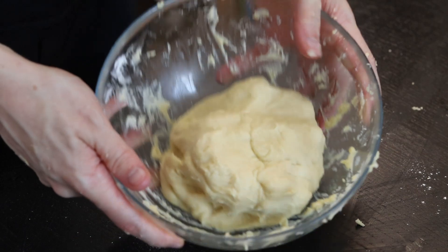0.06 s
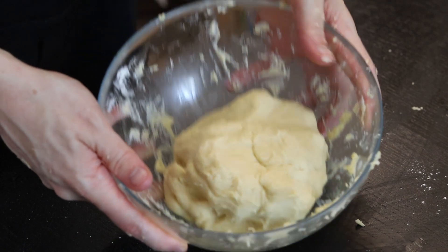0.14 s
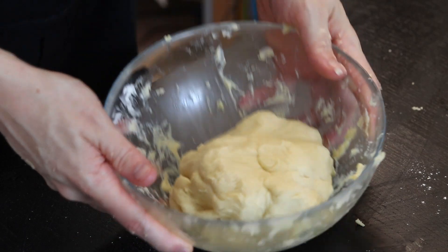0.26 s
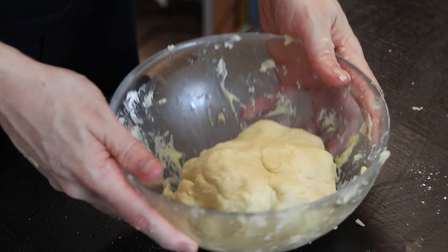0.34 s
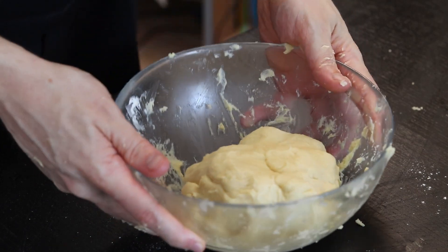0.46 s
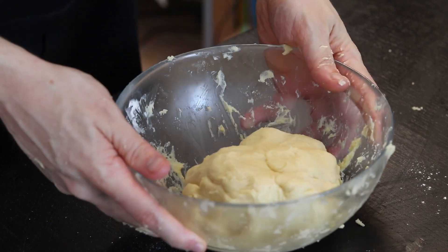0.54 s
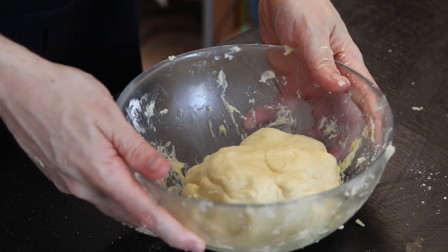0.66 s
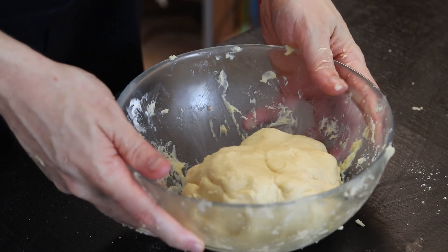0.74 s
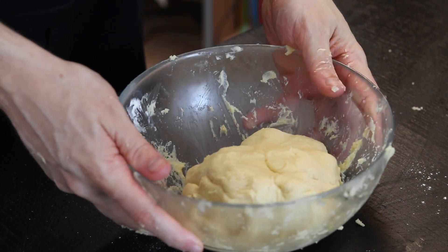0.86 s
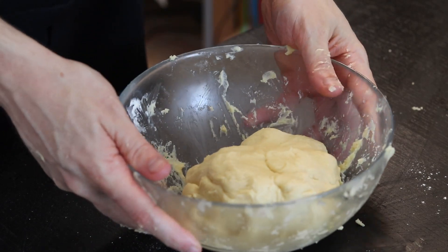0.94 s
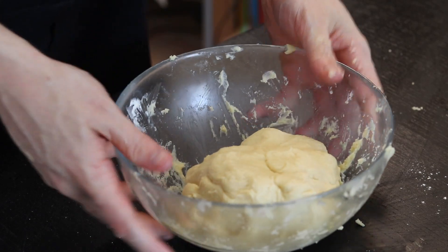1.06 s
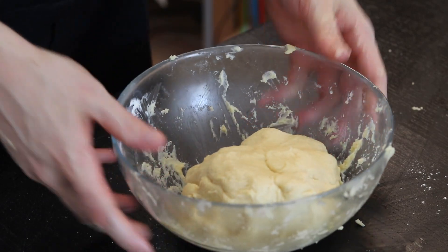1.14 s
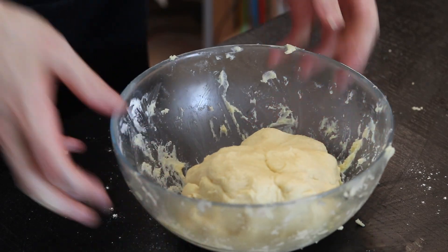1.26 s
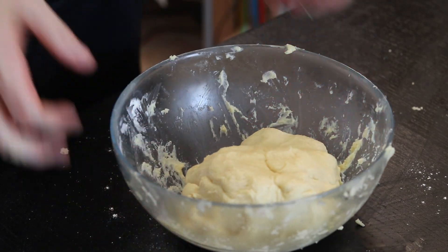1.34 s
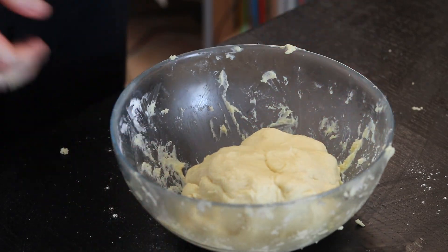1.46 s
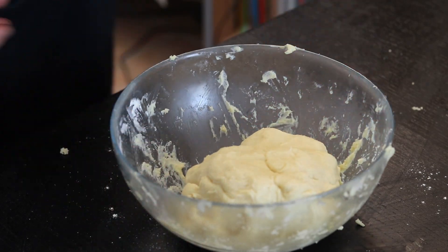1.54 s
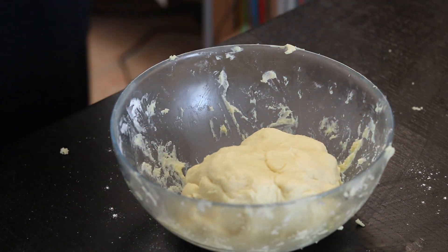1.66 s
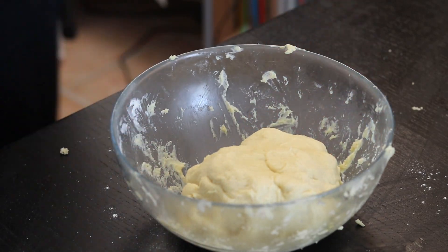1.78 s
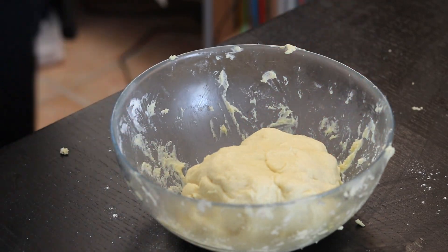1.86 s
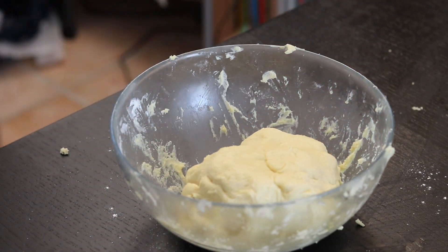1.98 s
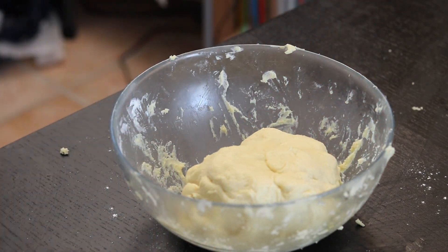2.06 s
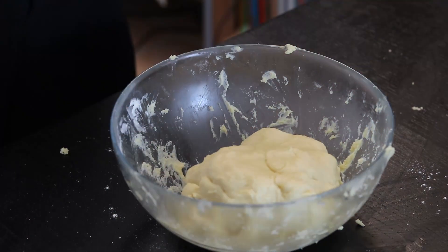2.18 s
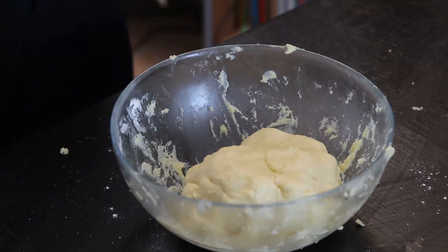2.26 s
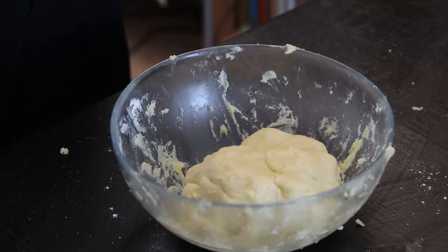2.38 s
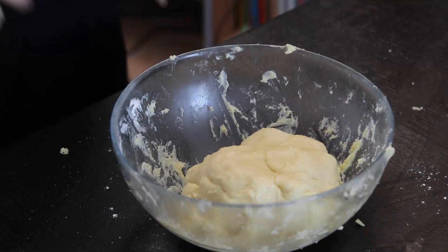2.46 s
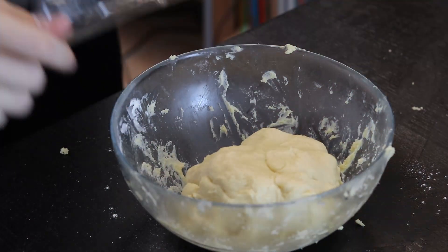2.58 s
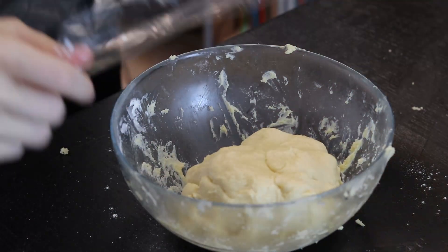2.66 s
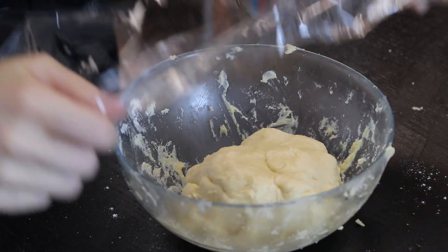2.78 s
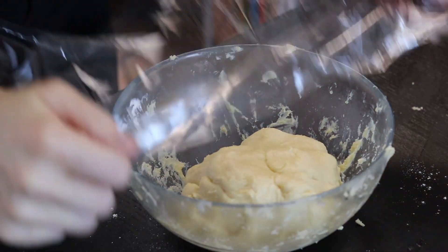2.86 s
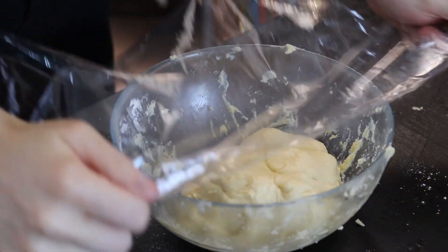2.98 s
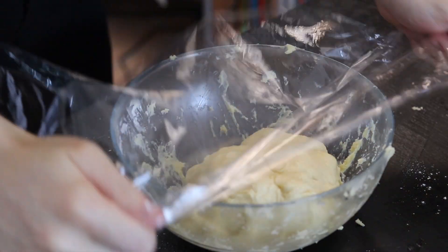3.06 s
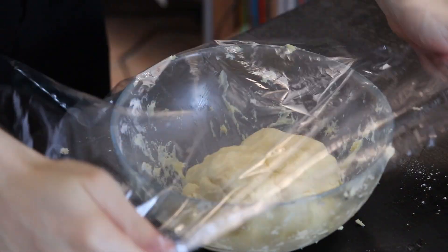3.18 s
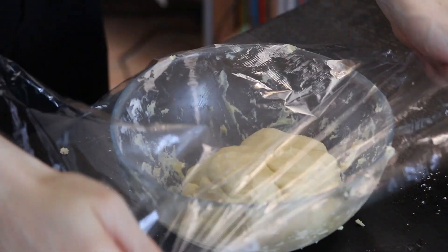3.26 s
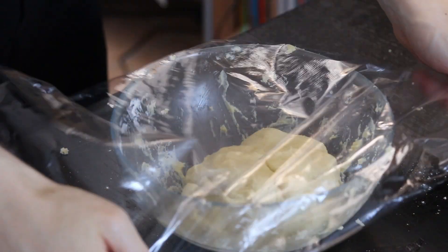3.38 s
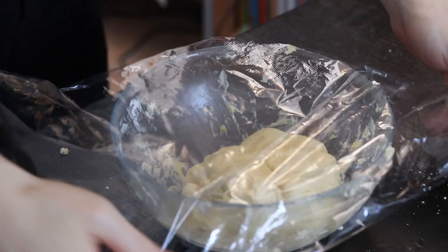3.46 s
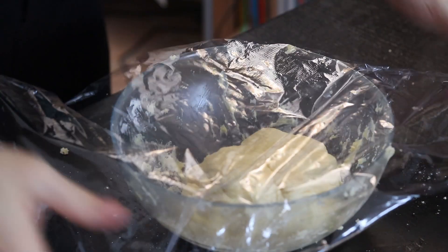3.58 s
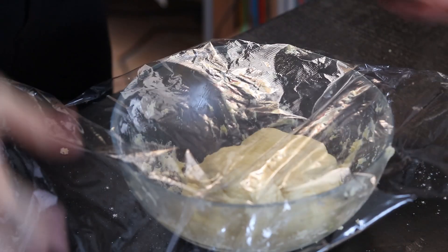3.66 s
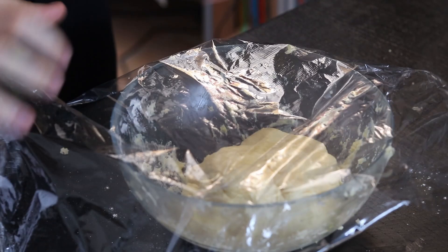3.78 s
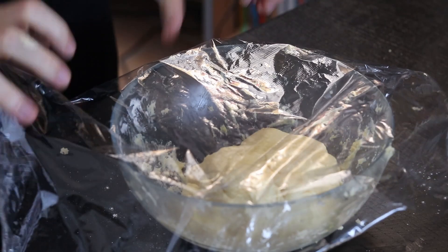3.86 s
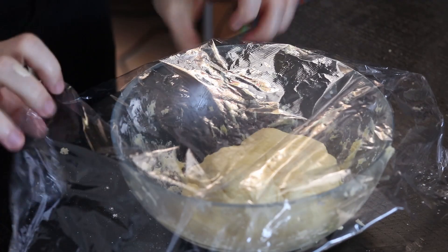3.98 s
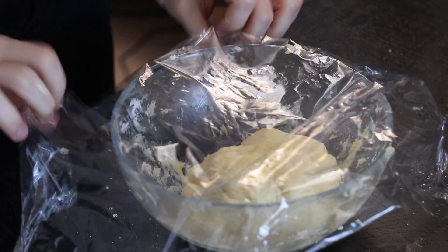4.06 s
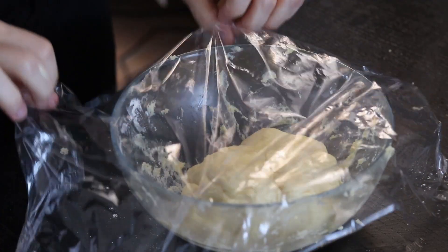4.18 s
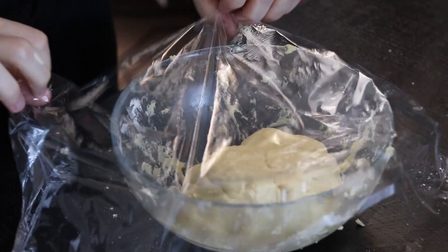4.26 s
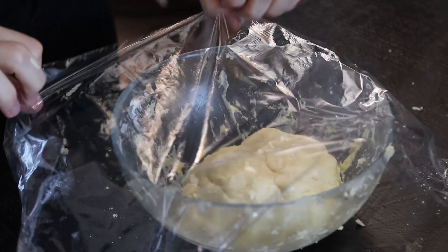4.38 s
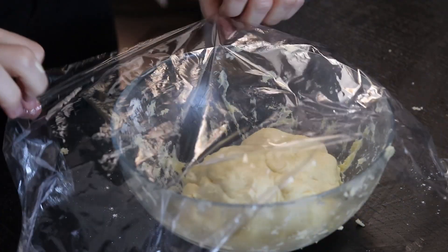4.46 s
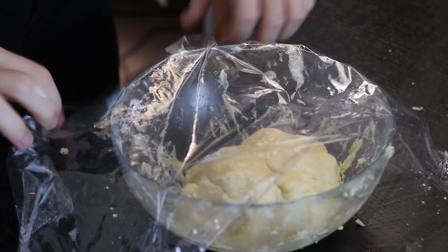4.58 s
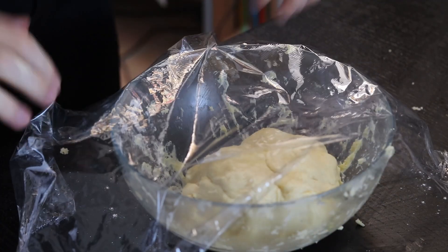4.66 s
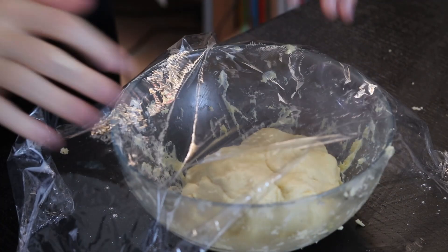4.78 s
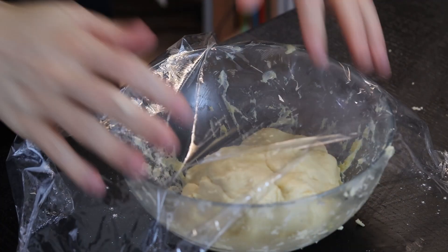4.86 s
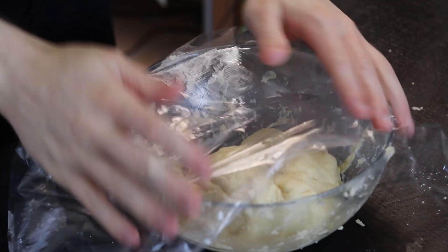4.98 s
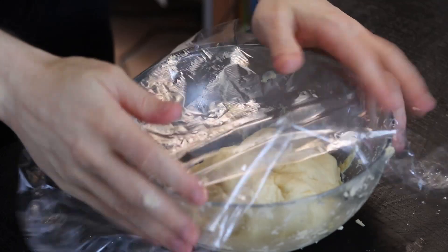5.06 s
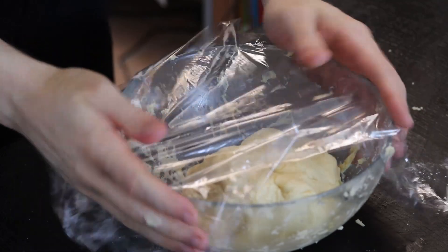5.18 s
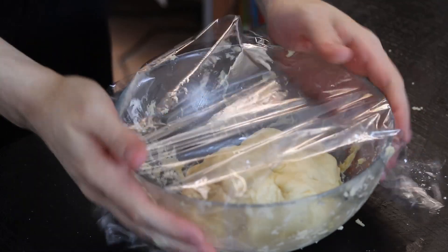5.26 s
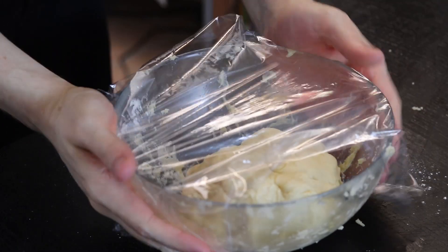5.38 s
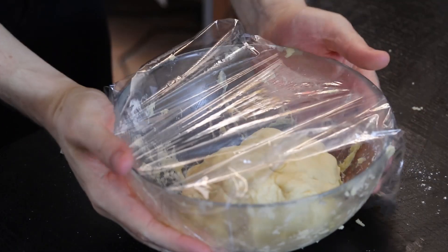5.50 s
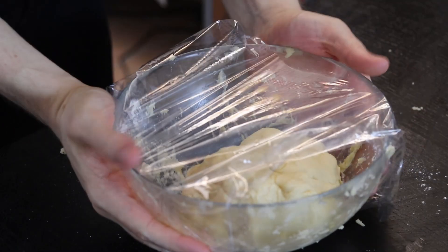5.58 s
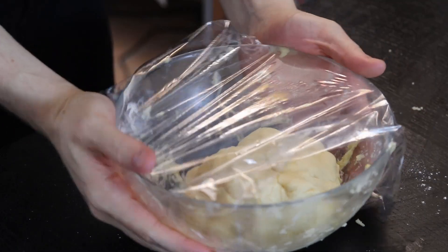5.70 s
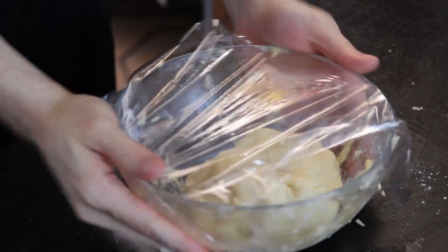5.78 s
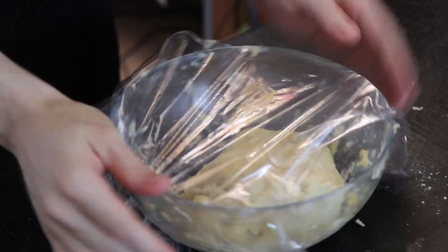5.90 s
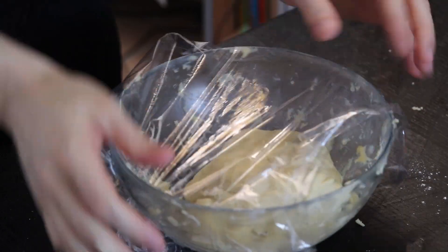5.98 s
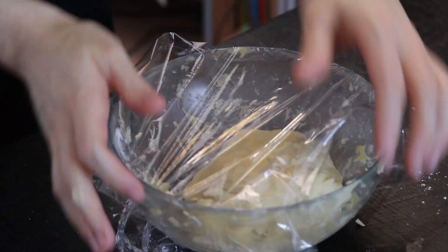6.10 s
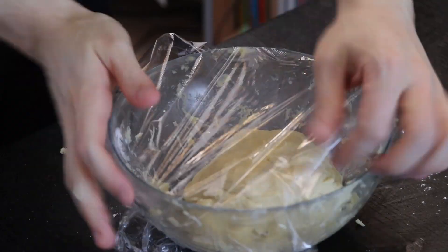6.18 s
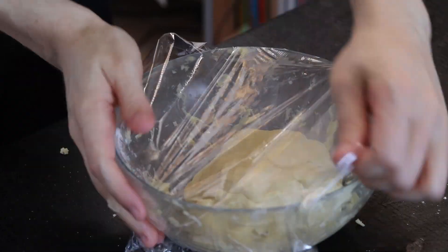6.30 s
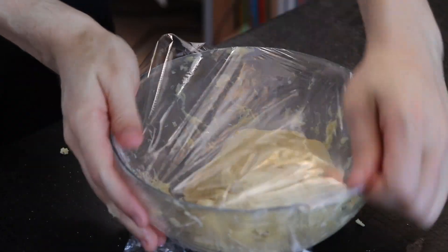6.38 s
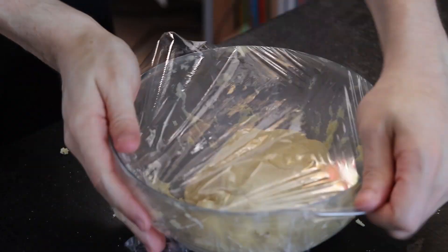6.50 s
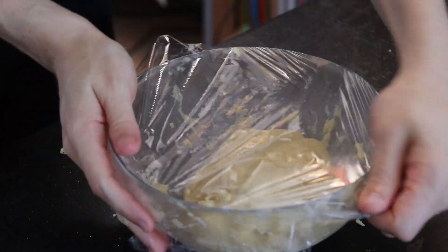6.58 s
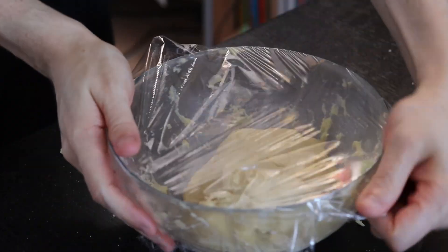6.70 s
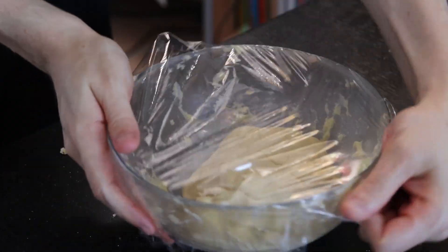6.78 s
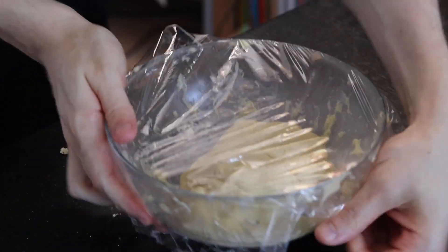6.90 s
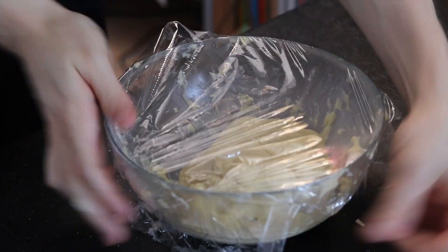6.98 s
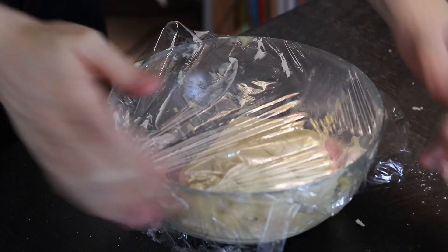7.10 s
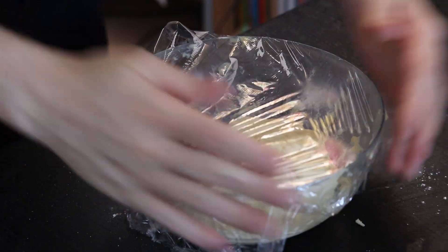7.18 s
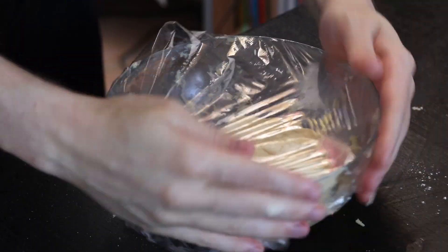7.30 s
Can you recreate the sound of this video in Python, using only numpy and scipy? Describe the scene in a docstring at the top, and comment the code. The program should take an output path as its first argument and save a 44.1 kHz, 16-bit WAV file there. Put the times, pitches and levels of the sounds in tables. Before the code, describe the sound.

A heavy glass bowl thuds onto a wooden table, then after a quiet gap, plastic film crinkles, snaps and stretches in growing bursts.

```python
"""A small room with a wooden table: a glass bowl of dough lands on it with one hard thud.
The thud is a push on the wood, a glassy clatter and decaying table modes; a gritty scuff follows.
Cling film is lifted, draped and smoothed down: dense filtered impulses rustle and short bursts snap as
creases. Irregular pulses through narrow resonances give short pitched swells and a low scrape of the
bowl, which bumps softly. Shaped noise and a low sine lie underneath as hiss and hum."""
import sys
import numpy as np
from scipy import signal
from scipy.fft import rfft, irfft, next_fast_len
from scipy.io import wavfile
from scipy.ndimage import uniform_filter1d, map_coordinates

SR = 44100
rng = np.random.default_rng(int(sys.argv[2]) if len(sys.argv) > 2 else 0)


def generate_wav(sig):
    """Save sig (samples, or channels by samples) to the path in sys.argv[1] as 16-bit PCM at SR."""
    pcm = np.round(np.clip(np.atleast_2d(sig).T, -1, 1) * 32767).astype(np.int16)
    wavfile.write(sys.argv[1], SR, pcm)


N = 323694  # samples, about 7.3 s

# Bowl meets table. Each row: start in seconds, level in dB, hardness as the corner of the blow in Hz.
BOWL_KNOCKS = [(0.3373, -15.5, 13000), (0.636, -44, 150), (6.683, -36.5, 357), (7.038, -44.5, 650)]
# Ringing modes of the table with the bowl on it. Each row: pitch in Hz, relative level in dB, t60 in seconds.
TABLE_MODES = [(105, -24.5, 0.36), (119.5, -13, 0.61), (166.5, 2, 0.24), (191.8, -8, 0.31), (228, -2, 0.28),
               (259, -23, 0.4), (301.6, -6.5, 0.36), (341.88, -1.5, 0.31), (374.3, 2.5, 0.14),
               (507, -1, 0.21), (546, -13.5, 0.32), (606, -10, 0.2), (671, -11, .28), (750, -12, 0.23),
               (907, -20, 0.39), (978, -24.5, 0.4553), (1048, -17, 0.37), (1165, -31, 0.46),
               (1254, -23, .27), (1630, -11, 0.14), (1690, -26, 0.49), (1885, -29, 0.25),
               (2390, -19, 0.069), (2600, -36, .25)]
# Spectrum of the first push on the wood. Each row: frequency in Hz, relative level in dB.
PUSH_SPECTRUM = [(30, -45), (60, -29), (85, -2.5), (115, 1), (170, 6), (250, 1.5), (360, 0.5), (500, -8),
                 (800, -12.5), (1500, -32.5), (4000, -38), (16000, -84)]
# Spectrum of glass chattering on wood at contact. Each row: frequency in Hz, relative level in dB.
CLATTER_SPECTRUM = [(60, -40), (150, -25), (350, -4.5), (600, 4.5), (1100, -2), (1650, -5.5), (2050, -10.5),
                    (2450, -7.5), (2900, -22), (6000, -22.5), (7200, -30), (8700, -28.5), (10500, -41),
                    (16000, -48)]
# Spectrum of floury grit under the bowl. Each row: frequency in Hz, relative level in dB.
GRIT_SPECTRUM = [(800, -18), (2000, 4), (3400, -2), (6000, -3), (7200, -2), (8700, -1), (10500, -13),
                 (16000, -17)]
# Pulls, drapes and presses of the film: four rows fetch it, two carry it over, four drape it and let go,
# five tug the far edge, five smooth it down, four stretch it round the rim, one is a last pat.
# Each row: time of full strength in seconds, time to swell by 10 dB in seconds, hold in seconds,
# crinkle level in dB, level of sliding hands over the crinkle in dB.
FILM_STROKES = [ (1.37, .13, .24, -72.5, -2), (2.02, .04, .05, -70.5, -3.5),
                (2.138, .003, .045, -55.6, -7.5), (2.29, .04, .12, -66, -11), (2.57, .025, .3, -63.3, -12),
                (2.908, .028, .012, -53, -14), (3.125, .09, .065, -57.2, -10.5), (3.34, .1, .1, -59.7, -7),
                (3.46, .03, .075, -55.3, -7.5), (3.585, .02, .015, -67, 3), (4.01, .11, .065, -70.4, -1.5),
                (4.15, .02, .058, -62.2, -4.5), (4.4, .12, .015, -54.6, -6.5), (4.565, .03, .02, -67, -2),
                (4.612, .012, .02, -55.8, -8), (5.008, .003, .1, -57.5, -5.5),
                (5.13, .035, .025, -51.3, -8), (5.232, .022, .325, -52, -10), (5.62, .07, .057, -57.2, -8),
                (5.83, .05, .07, -53, -6), (6.345, .075, .055, -52.8, -6), (6.562, .08, .01, -48.3, -7.5),
                (6.635, .008, .085, -52.2, -6.5), (6.962, .13, .035, -51.3, -3.5),
                (7.326, .03, .02, -52.2, -8.5)]
# Spectrum of the crinkling film. Each row: frequency in Hz, relative level in dB.
CRINKLE_SPECTRUM = [(700, -30), (1200, -4), (1500, -5), (2300, -2), (3000, -3.5), (3900, -3), (5400, -2.5),
                    (6700, -5.5), (7800, -1.5), (8700, 1.5), (10300, -6.5), (14300, -6), (15500, -14),
                    (16000, -10.5)]
# Spectrum of hands sliding on the film. Each row: frequency in Hz, relative level in dB.
SLIDE_SPECTRUM = [(150, -12), (300, -3), (600, -0.5), (900, 0), (1300, -0.5), (2000, -6), (3200, -25),
                  (7000, -25)]
# The sharpest creases snapping through. Each row: start in seconds, level in dB before SNAP_GAIN_DB,
# pitch in Hz.
SHARP_SNAPS = [(2.1367, -43, 6260), (2.3531, -46, 8320), (2.3945, -49, 4560), (2.4304, -41, 5770),
               (2.4733, -44, 7650), (2.9103, -39, 8320), (2.9238, -36, 8440), (2.9836, -39, 7950),
               (3.0527, -42, 8230), (3.1218, -43, 8490), (3.1857, -37, 5850), (3.275, -40, 8340),
               (3.3348, -35, 4110), (3.3917, -37, 5570), (3.46, -30.5, 5480), (3.912, -47, 5230),
               (4.3924, -42, 8390), (4.413, -32.5, 8030), (4.6079, -47, 8120), (5.01, -44, 4050),
               (5.4187, -29.5, 8400), (5.428, -36, 7870), (5.459, -33, 5330), (5.5238, -39, 7480),
               (5.9703, -41, 8430), (6.0662, -39, 4500), (6.2716, -41.5, 5770), (6.552, -37, 8260),
               (6.571, -31, 8480), (6.6367, -36, 5520), (6.6428, -30, 8140), (6.7136, -43, 5250),
               (6.7695, -27.5, 4310), (6.777, -31.5, 4480), (6.8516, -36, 5080), (6.8803, -44, 5890),
               (6.9598, -32, 8380), (7.3214, -38, 4950)]
# Short pitched swells of irregular pulses; the last row is a low, longer scrape of the bowl.
# Each row: centre in seconds, half-length of the swell in seconds, level in dB, typical pulses a second,
# main resonance in Hz.
PITCHED_SWELLS = [(2.233, .028, -67.5, 180, 1410), (2.681, 0.041, -69, 113, 2470),
                  (4.2, .04, -67, 190, 1560), (4.354, 0.043, -63, 175, 1490), (4.445, .025, -66, 180, 1310),
                  (6.424, 0.044, -57, 200, 1350), (6.568, 0.024, -48, 224, 1294),
                  (6.96, 0.18, -60.5, 130, 467)]
# Narrow resonances of the swells. Each row: multiple of the main resonance, width in Hz, relative level in dB.
SWELL_RESONANCES = [(.52, 35, -4), (.66, 30, -4), (1, 130, -1), (2.19, 150, -13)]
# Decay of the room. Each row: frequency in Hz, t60 in seconds.
ROOM_DECAY = [(150, 0.48), (350, 0.54), (700, 0.42), (1500, 0.42), (4000, 0.3), (9000, 0.15), (15000, 0.42)]
# Spectrum of the room noise. Each row: frequency in Hz, relative level in dB.
AIR_SPECTRUM = [(15, -26), (30, -15), (85, -7.5), (125, -1), (160, 0.5), (210, -6.5), (400, -10.5),
                (600, -14), (900, -18.5), (1600, -24.5), (6000, -28), (16000, -30)]

# the bowl shifts on the floury table as it lands
SKID_DB, SKID_HOLD_S, SKID_FADE_DB_PER_S = -67, 0.16, 200
# the film settles once let go, then its folds go on relaxing faintly
RELEASE_DB_PER_S, RELAX_DB, RELAX_DB_PER_S = 146, -6, 78
HANG_DB = -77.5  # the quietest rustle, while the film is fetched or hangs loose
SNAP_GAIN_DB = 0.5
# lesser creases give way at random: more often and harder as the crinkle grows
BRISK_DB = -55  # crinkle level at which the rate and level below hold
CREASES_PER_S, CREASE_DB, CREASE_SCATTER_DB = 26, -43, 3.1
CREASE_GROWS = 0.4  # dB per dB of crinkle
CREASE_HZ, CREASE_SPREAD_OCT = 8000, 0.3
STILL_DB = -13.5  # this far under a brisk crinkle no lesser crease gives way
HUM_HZ, HUM_DB = 99.7, -67.5
TOP_HZ = 15900


def knocks(ring_db=-9, push_db=4, clatter_db=-33.5, clatter_life_s=0.003, wet_db=0, boom_db=-11):
    """Each blow pushes the wood, chatters and rings the table; soft blows lose their treble."""
    out = np.zeros(N)
    t = np.arange(SR * 3 // 4) / SR
    for start, db, hard_hz in BOWL_KNOCKS:
        ring = np.zeros(len(t))
        for k, (hz, level, t60) in enumerate(TABLE_MODES):
            # neighbouring modes start in opposite directions
            ring += (-1) ** k * amp(level - 60 * t / t60) * np.sin(2 * np.pi * hz * t)
        chatter = rng.standard_normal(len(t)) * np.exp(-t / clatter_life_s)
        clatter = unit(signal.fftconvolve(chatter, pulse(CLATTER_SPECTRUM))[:len(t)])
        push = np.zeros(len(t))
        add(push, 0, pulse(PUSH_SPECTRUM))
        blow = amp(ring_db) * ring * (1 - np.exp(-t / 0.00081))
        blow += amp(clatter_db) * room(clatter, wet_db)
        blow += amp(push_db) * room(push, boom_db)
        # the contact is a damped spring: it passes little far above its corner
        blow = filtered(blow, lambda hz: 1 / (1 + 1j * hz / hard_hz - (hz / hard_hz) ** 2))
        add(out, start, amp(db) * blow)
    return out


def skid():
    """Irregular grit impulses make a short scuff under the bowl from the first thud on."""
    t = np.arange(N) / SR - BOWL_KNOCKS[0][0]
    level_db = SKID_DB - SKID_FADE_DB_PER_S * np.maximum(t - SKID_HOLD_S, 0)
    grit = coloured(crackle(rate=5500, scatter_db=3), GRIT_SPECTRUM)
    return grit * amp(level_db) * (t > 0)


def handling():
    """Levels in dB of crinkling and of sliding: every stroke swells, holds, settles and relaxes."""
    t = np.arange(N) / SR
    crinkle_power = amp(HANG_DB) ** 2 * (t > FILM_STROKES[0][0]) + 1e-12
    slide_power = np.full(N, 1e-12)
    for start, swell, hold, db, slide_db in FILM_STROKES:
        since_release = np.maximum(t - start - hold, 0)
        settling = -RELEASE_DB_PER_S * since_release
        relaxing = RELAX_DB - RELAX_DB_PER_S * since_release
        level_db = db - 10 * np.maximum(start - t, 0) / swell
        level_db += np.maximum(settling, relaxing)
        power = amp(np.maximum(level_db, -160)) ** 2
        crinkle_power += power
        slide_power += power * amp(slide_db) ** 2
    return 10 * np.log10(crinkle_power), 10 * np.log10(slide_power)


def film(crinkle_db, slide_db, tick_db=-3, tick_rate=35, count=12):
    """Moving film sheds a hail of tiny buckles over a fine rustle; hands slide on it more dully."""
    ticks = np.zeros(N)
    # creases of different sizes each tick with their own colour
    for hz in np.geomspace(2500, 13000, count):
        impulses = crackle(tick_rate, scatter_db=3.5)
        ticks += unit(signal.oaconvolve(impulses, snap(hz))[:N])
    rustle = shifting(coloured(crackle(rate=7000, scatter_db=2.0), CRINKLE_SPECTRUM), patchy_db=2.5)
    crinkle = unit(rustle + amp(tick_db) * coloured(ticks, CRINKLE_SPECTRUM))
    crinkle = crinkle * amp(crinkle_db + 1.57 * wobble(70))
    slide = shifting(coloured(crackle(rate=2500, scatter_db=4.0), SLIDE_SPECTRUM), patchy_db=2.5)
    return crinkle + slide * amp(slide_db + 0.66 * wobble(35))


def shifting(x, patchy_db):
    """Folds open and close, so passing resonances colour the sound; rms 1."""
    z = signal.stft(x, nperseg=512)[2]
    # random gains, smoothed over frequency and then over time
    field = uniform_filter1d(rng.standard_normal(z.shape), size=7, axis=0)
    field = uniform_filter1d(field, size=7, axis=1)
    return unit(signal.istft(z * amp(patchy_db * unit(field)), nperseg=512)[1][:N])


def snaps(crinkle_db):
    """The loud single creases, and lesser ones whose rate and size follow the crinkle."""
    out = np.zeros(N)
    for start, db, hz in SHARP_SNAPS:
        add(out, start, amp(db + SNAP_GAIN_DB) * snap(hz))
    effort_db = crinkle_db - BRISK_DB
    chance = CREASES_PER_S / SR * amp(CREASE_GROWS * effort_db) * (effort_db > STILL_DB)
    starts = np.flatnonzero(rng.random(N) < chance)
    for i, (size, pitch) in zip(starts, rng.standard_normal((len(starts), 2))):
        db = CREASE_DB + CREASE_GROWS * effort_db[i] + CREASE_SCATTER_DB * size
        hz = CREASE_HZ * 2 ** (CREASE_SPREAD_OCT * pitch)
        add(out, i / SR, amp(db) * snap(hz))
    return out


def snap(hz, size=512):
    """A buckling crease: a sharp flick, broad around hz, and a brief flutter; always the same energy."""
    t = np.arange(size) / SR
    flick_and_flutter = np.exp(-t / 0.0002) + 0.1 * np.exp(-t / 0.0018)
    burst = rng.standard_normal(size) * flick_and_flutter
    colour = pulse([(hz / 8, -22), (hz / 2, -5), (hz, 0), (hz * 2, -9)], size=256)
    click = np.convolve(burst, colour)
    return 2 * click / np.linalg.norm(click)


def pitched_swells(unevenness=0.35):
    """Pulses at an uneven rate ring narrow resonances: short pitched swells, then a low scrape."""
    out = np.zeros(N)
    ring_t = np.arange(SR // 10) / SR
    t = np.arange(-SR // 4, SR // 4) / SR
    for centre, length, db, rate, main_hz in PITCHED_SWELLS:
        turns = np.cumsum(rate * np.exp(unevenness * wobble(150)[:len(t)])) / SR
        # one impulse at each whole turn, under a bell-shaped swell
        pulses = unit(np.diff(np.floor(turns), prepend=0)) * np.exp(-2 * (t / length) ** 2)
        ring = np.zeros(len(ring_t))
        for ratio, width, level in SWELL_RESONANCES:
            decay = width * np.exp(-np.pi * width * ring_t)
            ring += amp(level) * decay * np.cos(2 * np.pi * ratio * main_hz * ring_t)
        swell = signal.fftconvolve(pulses, ring / np.linalg.norm(ring))
        add(out, centre + t[0], amp(db) * swell)
    return out


def room(x, wet_db, build_s=0.0018):
    """x plus the walls' answer, each frequency dying at its own speed."""
    hz, t, z = signal.stft(rng.standard_normal(SR * 3 // 4), SR, nperseg=256)
    decay = amp(-60 * t / along(ROOM_DECAY, hz)[:, None])
    tail = signal.istft(z * decay * (1 - np.exp(-t / build_s)), SR, nperseg=256)[1]
    return x + amp(wet_db) * signal.fftconvolve(x, tail / np.linalg.norm(tail))[:len(x)]


def background():
    """Steady room noise from coloured hiss, and a thin mains hum from one sine."""
    hum = np.sin(2 * np.pi * HUM_HZ * np.arange(N) / SR)
    air = coloured(rng.standard_normal(N), AIR_SPECTRUM)
    return amp(-64.0) * air + amp(HUM_DB) * hum


def crackle(rate, scatter_db):
    """Random tiny impulses of very unequal size, about rate a second."""
    hits = rng.random(N) < rate / SR
    signs = rng.choice([-1, 1], N)
    return hits * signs * amp(scatter_db * np.clip(rng.standard_normal(N), -2, 2))


def wobble(rate):
    """A smooth random curve, rate knots a second."""
    knots = rng.standard_normal(int(N * rate / SR) + 4)
    return map_coordinates(knots, [np.arange(N) * rate / SR])


def pulse(spectrum, size=4096):
    """The most compact causal (minimum-phase) pulse with this spectrum, peak 1."""
    cepstrum = irfft(np.log(amp(along(spectrum, np.fft.rfftfreq(size, 1 / SR)))))
    # folding the cepstrum forward in time packs the energy at the start
    cepstrum[1:size // 2] *= 2
    cepstrum[size // 2 + 1:] = 0
    p = irfft(np.exp(rfft(cepstrum)))
    return p / np.abs(p).max()


def coloured(x, spectrum):
    """x filtered by the given spectrum, at rms 1."""
    return unit(filtered(x, lambda hz: amp(along(spectrum, hz))))


def filtered(x, response):
    """x times a complex response of frequency."""
    m = next_fast_len(len(x) + SR // 2)
    return irfft(rfft(x, m) * response(np.fft.rfftfreq(m, 1 / SR)), m)[:len(x)]


def along(points, hz):
    """(Hz, value) points read on a log axis."""
    f, v = np.transpose(points)
    return np.interp(np.log(hz + 1), np.log(f + 1), v)


def amp(db):
    """Decibels to gain."""
    return 10 ** (np.asarray(db) / 20)


def unit(x):
    """Scale to rms 1."""
    return x / np.sqrt(np.mean(x ** 2) + 1e-20)


def add(track, start, x):
    """Mix x into the track from start in seconds."""
    part = track[max(round(start * SR), 0):][:len(x)]
    part += x[:len(part)]


def scene():
    """Bowl and film close by, in the room."""
    crinkle_db, slide_db = handling()
    wrapping = film(crinkle_db, slide_db) + pitched_swells() + snaps(crinkle_db)
    return (knocks() + skid() + room(wrapping, wet_db=-11) + background())[None]


def record(dry):
    """A steep treble cut: nothing passes from the band limit up."""
    return filtered(dry[0], lambda hz: hz < TOP_HZ)[None]


dry = scene()
out = record(dry)
generate_wav(out)
```